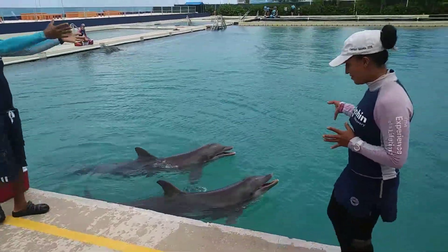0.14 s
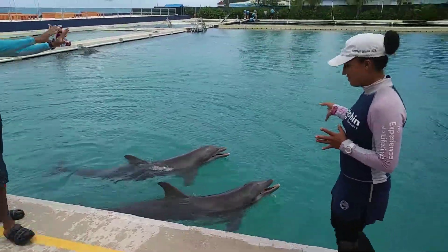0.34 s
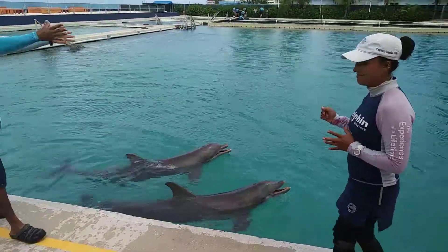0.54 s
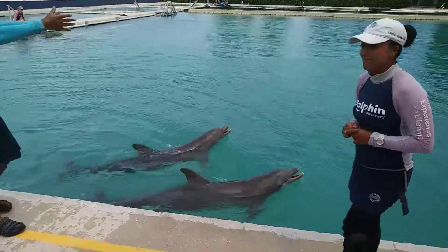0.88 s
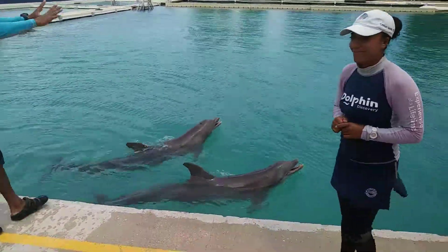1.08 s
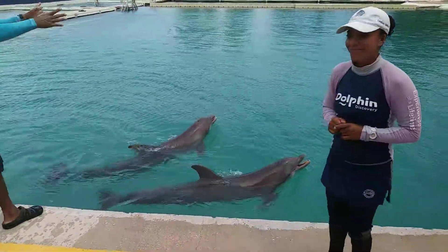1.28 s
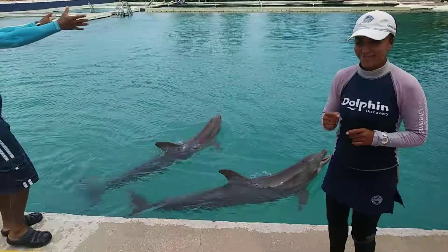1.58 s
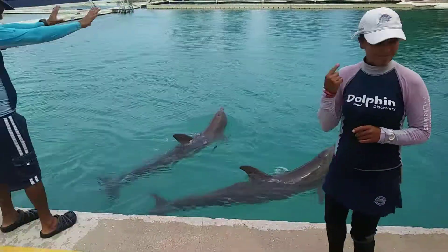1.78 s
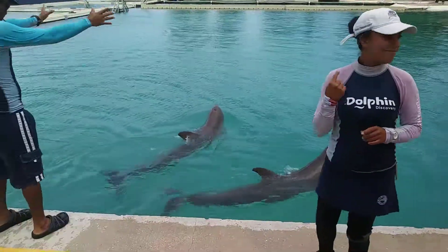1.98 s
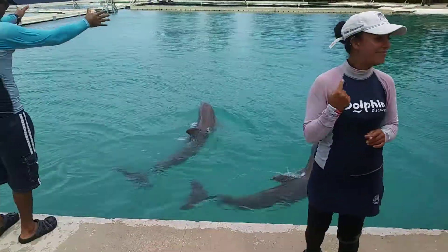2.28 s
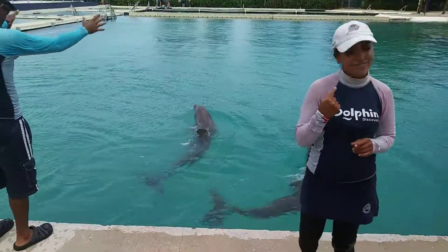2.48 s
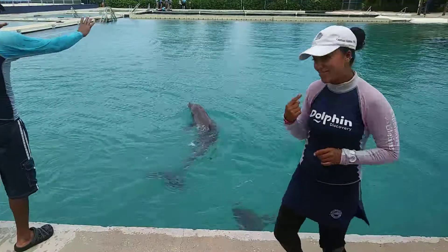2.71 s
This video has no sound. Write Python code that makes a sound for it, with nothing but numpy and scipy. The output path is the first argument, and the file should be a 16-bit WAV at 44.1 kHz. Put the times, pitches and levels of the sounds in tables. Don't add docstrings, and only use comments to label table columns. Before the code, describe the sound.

Two or three dolphins close by give shrill, nasal squawks in quick turns, hoarse and smooth calls overlapping, with faint distant answers, small water ticks, echo off pool walls and low handling rumble on a small microphone.

```python
import sys
import numpy as np
from scipy import signal
from scipy.fft import rfft, irfft
from scipy.io import wavfile
from scipy.ndimage import uniform_filter1d, minimum_filter1d

SR = 44100
rng = np.random.default_rng(int(sys.argv[2]) if len(sys.argv) > 2 else 0)


def convert_level_to_amplitude(level_db):
    exponent = np.asarray(level_db, float) / 20
    return 10 ** exponent


def persist_wave(psi):
    counts = np.round(np.clip(psi, -1, 1) * 32767).astype(np.int16)
    wavfile.write(sys.argv[1], SR, np.atleast_2d(counts).T)


N = 125685
EDGE_HZ = 15750

# time in seconds, level in dB.
GUSTS = [(0.0, -21.5), (0.09, -11), (0.13, -21.5), (0.31, -17.5), (0.59, -54.5), (0.98, -52), (1.02, -30.5),
         (1.27, -68), (1.31, -30), (1.44, -30), (1.71, -49), (1.75, -59), (1.85, -56.5), (2.02, -26),
         (2.17, -42), (2.22, -27.5), (2.67, -54.5), (2.85, -49)]
# frequency in Hz, density in dB per Hz.
RUMBLE_SPECTRUM = [(12, -52), (30, -16), (75, 4.5), (119, 1.5), (170, -6.5), (350, -25), (615, -40),
                   (897, -60.5), (1200, -45.5), (1560, -78), (2640, -120)]
# frequency in Hz, density in dB per Hz.
AIR_SPECTRUM = [(300, -1.5), (700, -9.5), (1500, -13.5), (4000, -27), (8500, -37.5), (11500, -11),
                (15500, -32)]

# time in seconds, pitch in Hz, first harmonic in dB.
LOUD_CALLS = [
    [(.087, 2205, -17), (.134, 2466, -6.5), (.194, 2516, -13.5), (.28, 2314, -13), (.305, 2140, -18),
     (.335, 1890, -25.5), (.385, 1557, -47.5)],
    [(.632, 2076, -41), (.645, 2001, -17), (.662, 1964, -14), (.69, 2224, -10), (.725, 2281, -14.5),
     (.785, 2140, -15.5), (.803, 1976, -21.5), (.827, 1742, -27.5), (.85, 1643, -51.5)],
    [(1.268, 2460, -21.5), (1.284, 2372, -9.5), (1.298, 2328, -8.5), (1.32, 2285, -12.5),
     (1.356, 2132, -13.5), (1.379, 2130, -19.5)],
    [(1.458, 2643, -11), (1.474, 2635, -12), (1.482, 2193, -8.5), (1.528, 2106, -5.5), (1.61, 1933, -15),
     (1.655, 1733, -22)],
    [(2.298, 1974, -12.5), (2.312, 1871, -16), (2.36, 1892, -9), (2.395, 1872, -17.5), (2.425, 1742, -17.5),
     (2.436, 1726, -37), (2.46, 1600, -47)],
    [(2.787, 1942, -54.5), (2.801, 1951, -16), (2.86, 1967, -19.5)],
    [(1.925, 1956, -20), (1.955, 1830, -25), (1.99, 1698, -27), (2.04, 1569, -29.5)],
]
# second harmonic in dB, third in dB, higher ones in dB, rasp in dB.
LOUD_VOICING = [(5.5, 8.5, 11, -9), (-3, 1, -1.5, -16), (-5.5, -33, -7.5, -46), (-1, -2, 5, -39),
                (-26.5, -4, 2, -21), (1.5, -6.5, 11.5, -16), (-30, -10.5, -23.5, -36.5)]
# start in seconds, length in seconds, first pitch in Hz, top pitch in Hz,
# first harmonic in dB.
STEADY_CALLS = [
    (0.113, 0.3, 1574, 1932, -19),
    (0.591, .27, 1700, 1815, -23.5),
    (1.06, .25, 1655, 1793, -26.5),
    (1.571, 0.2, 1544, 1869, -29.5),
    (2.065, 0.51, 1558, 1868, -27.5),
    (2.625, .215, 1584, 1745, -29.5),
]
# second harmonic in dB, higher ones in dB,
# exponent of the pitch sag, extra fade in dB.
STEADY_VOICING = [(-7.5, -33, 1.5, 1), (-1.5, -8.5, 1.5, 1), (4.5, 0.5, 1.7, -1), (9.5, -0.5, 1.54, 3),
                  (8, -2.5, 1.6, -1), (7.5, 3, 1.5, 0)]
# time in seconds, pitch in Hz, second harmonic in dB.
HOARSE_CALLS = [
    [(.627, 2400, -27.5), (.65, 2900, -16), (.7, 3094, -30.5), (.79, 2880, -41), (.84, 2840, -49.5)],
    [(1.22, 2323, -23.5), (1.235, 2517, -44), (1.27, 2506, -42.5), (1.32, 2740, -42.5), (1.37, 2790, -45)],
    [(1.863, 2412, -24.5), (1.9, 2393, -25.5), (1.94, 2430, -33.5), (1.99, 2600, -39), (2.03, 2680, -40)],
    [(2.048, 2500, -37), (2.066, 2367, -17.5), (2.1, 2766, -19), (2.18, 2756, -24.5), (2.27, 2573, -32),
     (2.33, 2600, -25), (2.44, 2690, -28), (2.56, 2770, -43)],
    [(2.578, 2445, -36), (2.593, 2525, -17), (2.615, 2864, -22.5), (2.655, 2805, -21), (2.685, 2745, -23),
     (2.76, 2612, -29), (2.85, 2510, -39)],
]
HOARSE_FIRST_DB = [-16, 18, -25, -4, 1.5]
# start in seconds, length in seconds, first pitch in Hz, top pitch in Hz,
# first harmonic in dB.
FAR_CALLS = [
    (1.825, 0.19, 934, 1324, -34.5),
    (2.256, 0.177, 701.4, 799.5, -39),
    (2.695, .15, 716, 779, -46),
]
# rise in seconds, sag share at 0.1 s past the top, start in dB,
# fade in dB at 0.1 s past the top.
STEADY_ARCH = (.068, .08, -13, -6)
FAR_ARCH = (.044, .26, -14, -8)
# start in seconds, length in seconds, first pitch in Hz,
# last pitch in Hz, level in dB.
HOOTS = [(1.029, 0.026, 5570, 5740, -49), (2.109, 0.055, 558, 590, -46), (2.198, 0.091, 710, 586, -42.5),
         (2.264, 0.14, 607, 650, -48), (1.881, .11, 431, 389, -47), (2.507, 0.28, 427, 354, -51),
         (2.729, 0.16, 488, 372, -44.5), (0.294, 0.13, 630, 662, -56), (0.908, 0.16, 739, 656, -60.5),
         (1.075, 0.055, 426, 452, -54), (1.727, 0.051, 300, 202, -29.5)]

# frequency in Hz, gain in dB.
LOUD_NOSE = [(1500, -9.5), (2300, 4), (4200, -6), (5000, 6), (5950, -5), (6450, -22.5), (8000, -33),
             (11500, -46), (16000, -57.5)]
# frequency in Hz, gain in dB.
STEADY_NOSE = [(1300, -11.5), (1900, -8), (3600, -0.5), (5300, -1), (6500, -30.5), (9000, -33),
               (16000, -64.5)]
# frequency in Hz, gain in dB.
FAR_NOSE = [(600, 0), (1400, 5), (2400, 13), (3200, -0.5), (4200, -8), (6000, -21), (16000, -70)]
# frequency in Hz, gain in dB.
HOARSE_NOSE = [(2300, -22.5), (2900, -13.5), (5200, 1.5), (7000, -25.5), (16000, -72)]
# frequency in Hz, density in dB per Hz.
RASP_SPECTRUM = [(900, -76), (1500, -16.5), (2300, -7), (3100, -7), (4100, -5.5), (5300, 2.5), (6100, -7.5),
                 (7400, -24), (15500, -48)]

# time in seconds, level in dB, level above 7 kHz in dB.
SPLASHES = [
    (1.166, -25.5, -35),
    (1.374, -26.5, -33),
    (1.663, -20.5, -9),
    (1.783, -36.5, -22.5),
    (2.831, -47, -14.5),
    (1.061, -46, -16),
    (2.05, -42, -16.5),
]
# frequency in Hz, 60 dB decay time in seconds.
WALL_DECAY = [(500, 0.19), (2000, 1.41), (5000, 1.09), (6000, 1.4), (7000, 1.35)]


def read(points, hz):
    f, value = np.transpose(points)
    return np.interp(np.log(hz + 1), np.log(f + 1), value)


def evened(x):
    return x / np.sqrt(np.mean(x ** 2) + 1e-20)


def white(size):
    return rng.standard_normal(max(size, 2 ** 14))[:size]


def drift(size, rate_hz):
    width = max(int(SR / rate_hz), 2)
    once = uniform_filter1d(white(size), width, mode="wrap")
    return evened(uniform_filter1d(once, width, mode="wrap"))


def coloured(spectrum, size):
    hz = np.fft.rfftfreq(size, 1 / SR)
    return evened(irfft(rfft(white(size)) * convert_level_to_amplitude(read(spectrum, hz)), size))


def add(mix, s, sound):
    part = mix[round(s * SR):][:len(sound)]
    part += sound[:len(part)]


def arch(row, shape, steep=1.5, extra_db=0):
    start, length, first_hz, top_hz, db = row
    rise_s, sag, start_db, fade_db = shape
    t = np.linspace(0, length, num=40)
    before = np.maximum(1 - t / rise_s, 0)
    after = np.maximum(t - rise_s, 0) * 10
    hz = top_hz * (1 - sag * after ** steep) - (top_hz - first_hz) * before ** 2
    level_db = db + start_db * before ** 3 + (fade_db + extra_db) * after ** 2
    return np.transpose([start + t, hz, level_db])


def call(curve, nose, order, jitter, shimmer_db, smear, rasp_db,
         first_db=0, second_db=0, third_db=0, higher_db=0):
    s, hz, db = np.transpose(curve)
    t = np.arange(s[0], s[-1], 1 / SR)
    hz = uniform_filter1d(np.interp(t, s, hz), int(0.0076 * SR), mode="nearest")
    turns = np.cumsum(hz * (1 + jitter * drift(len(t), 241))) / SR
    level_db = np.interp(t, s, db)
    dulled_db = 0.17 * np.minimum(level_db - db.max() - 1, 0)
    tone = np.zeros(len(t))
    for k in range(1, 8):
        gain_db = [first_db, second_db, third_db, higher_db][min(k, 4) - 1]
        gain_db = gain_db + read(nose, k * hz) - read(nose, order * hz)
        gain_db += (k > order) * dulled_db + shimmer_db * k ** 0.3 * drift(len(t), 110)
        flutter = 1 + (k * hz > 6400) * 0.35 * drift(len(t), 600)
        wave = np.sqrt(2) * np.cos(2 * np.pi * k * turns)
        tone += convert_level_to_amplitude(gain_db) * (k * hz < EDGE_HZ) * flutter * wave
    tone *= 1 + smear * drift(len(t), 650)
    rasp = convert_level_to_amplitude(rasp_db) * coloured(RASP_SPECTRUM, len(t))
    edge = np.clip(np.minimum(t - s[0], s[-1] - t) / 0.0019, 0, 1)
    return s[0], (edge * convert_level_to_amplitude(level_db) * [tone, rasp]).T


def rumble():
    s, db = np.transpose(GUSTS)
    level_db = np.interp(np.arange(N) / SR, s, db) + 2.66 * drift(N, 40)
    return convert_level_to_amplitude(level_db) * coloured(RUMBLE_SPECTRUM, N)


def earlier_call():
    t = np.arange(N) / SR
    rings = np.zeros(N)
    for hz, db in [(1840, -43.5), (3850, -39.0), (2900, -57.5), (5150, -54)]:
        rings += convert_level_to_amplitude(db) * drift(N, 270) * np.cos(2 * np.pi * hz * t)
    return rings * convert_level_to_amplitude(-60 * t / 2.9)


def open_air():
    return convert_level_to_amplitude(-57.5) * coloured(AIR_SPECTRUM, N)


def loud_dolphin():
    out = np.zeros((N, 2))
    for curve, (second_db, third_db, higher_db, rasp_db) in zip(LOUD_CALLS, LOUD_VOICING):
        add(out, *call(curve, LOUD_NOSE, order=1, jitter=0.00677, shimmer_db=1.73, smear=0.033,
                       rasp_db=rasp_db, second_db=second_db, third_db=third_db, higher_db=higher_db))
    return out


def echo(tone, rasp):
    taps = np.zeros(2 * SR)
    at = np.arange(300, 2 * SR - 20, 20)
    taps[at + rng.integers(0, 20, len(at))] = rng.choice([-1., 1.], len(at))
    hz, t, z = signal.stft(taps, SR, nperseg=256)
    deck_decay = convert_level_to_amplitude(13.0 - 60 * t / 0.25)
    wall_decay = convert_level_to_amplitude(-60 * t / read(WALL_DECAY, hz)[:, None])
    deck = signal.istft(z * deck_decay, SR, nperseg=256)[1]
    walls = signal.istft(z * wall_decay, SR, nperseg=256)[1]
    wet = signal.fftconvolve(tone + rasp, deck)
    wet += signal.fftconvolve(tone + convert_level_to_amplitude(-16.5) * rasp, walls)
    return wet[:N] / np.linalg.norm(deck + walls)


def steady_dolphin():
    out = np.zeros((N, 2))
    for row, (second_db, higher_db, steep, extra_db) in zip(STEADY_CALLS, STEADY_VOICING):
        curve = arch(row, STEADY_ARCH, steep, extra_db)
        add(out, *call(curve, STEADY_NOSE, order=1, jitter=0.0039, shimmer_db=1.34, smear=0.067,
                       rasp_db=-18, second_db=second_db, third_db=higher_db, higher_db=higher_db - 15.5))
    return out


def hoots():
    out = np.zeros(N)
    for s, length, first_hz, last_hz, db in HOOTS:
        u = np.linspace(0, 1, int(length * SR))
        glide_hz = first_hz + (last_hz - first_hz) * u
        hz = glide_hz * (1 + 9 * drift(len(u), 70) / first_hz)
        level = convert_level_to_amplitude(db + 5.3 * drift(len(u), 64)) * np.sin(np.pi * u)
        add(out, s, level * np.cos(2 * np.pi * np.cumsum(hz) / SR))
    return out


def hoarse_dolphin():
    out = np.zeros((N, 2))
    for curve, first_db in zip(HOARSE_CALLS, HOARSE_FIRST_DB):
        add(out, *call(curve, HOARSE_NOSE, order=2, jitter=0.022, shimmer_db=2.4, smear=0.3,
                       rasp_db=-7, first_db=first_db, third_db=-2))
    return out


def splashes():
    out = np.zeros(N)
    t = np.arange(600) / SR
    for s, db, top_db in SPLASHES:
        spectrum = [(1500, -40), (5000, 0.5), (8000, top_db), (15000, top_db - 27)]
        add(out, s, convert_level_to_amplitude(db - 60 * t / 0.066) * coloured(spectrum, len(t)))
    return out


def far_dolphins():
    out = np.zeros((N, 2))
    for row in FAR_CALLS:
        add(out, *call(arch(row, FAR_ARCH), FAR_NOSE, order=1, jitter=0.0099, shimmer_db=3.0,
                       smear=0.086, rasp_db=-10.5))
    return out


def scene():
    near = loud_dolphin() + steady_dolphin() + hoarse_dolphin()
    far = far_dolphins()
    far[:, 0] += hoots()
    sent = convert_level_to_amplitude(-12.5) * near + convert_level_to_amplitude(-7.5) * far
    calls = (near + far).sum(axis=1) + echo(*sent.T)
    mix = calls + splashes() + rumble() + earlier_call() + open_air()
    return mix[None]


def band_limit(x):
    return signal.sosfilt(signal.butter(12, 15720, fs=SR, output="sos"), x)


def record(dry):
    ceiling, span = 0.96, int(0.00066 * SR)
    gain = minimum_filter1d(ceiling / np.maximum(abs(dry), ceiling), span)
    gain = uniform_filter1d(uniform_filter1d(gain, span // 2), span // 2)
    low_pass = signal.firwin(511, EDGE_HZ, window=("kaiser", 9), fs=SR)
    mix = signal.oaconvolve(dry * gain, low_pass[None], "same")
    return band_limit(mix)


dry = scene()
out = record(dry)
persist_wave(out)
```